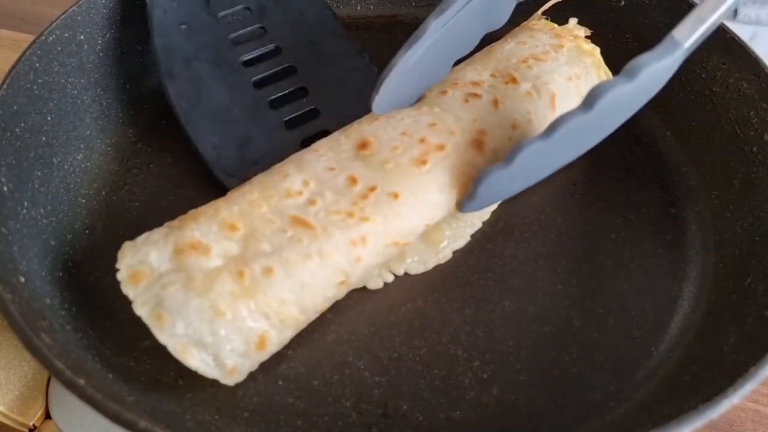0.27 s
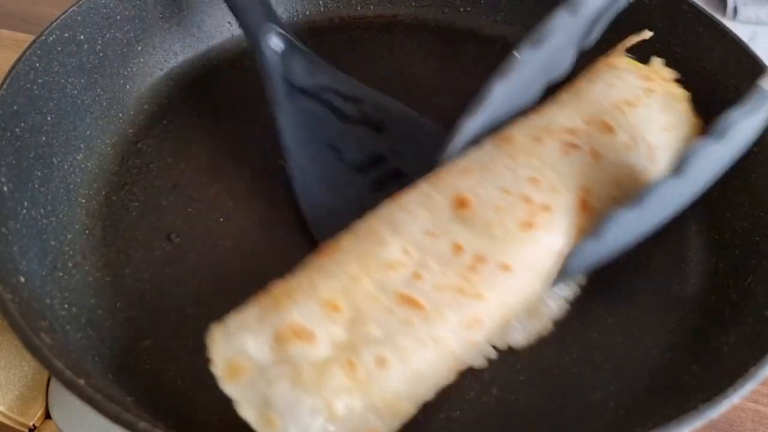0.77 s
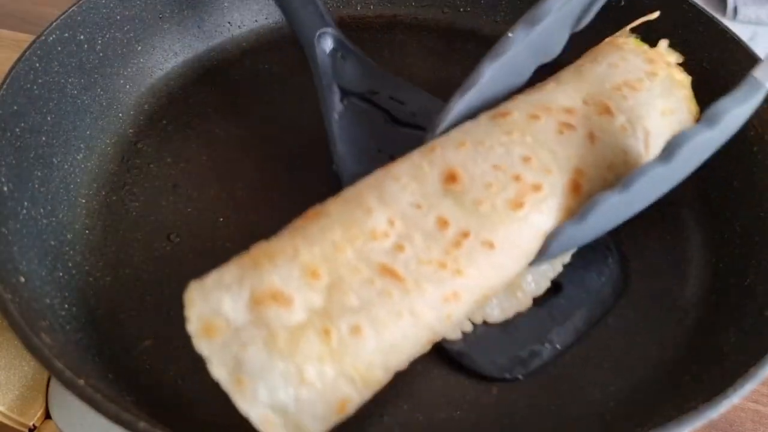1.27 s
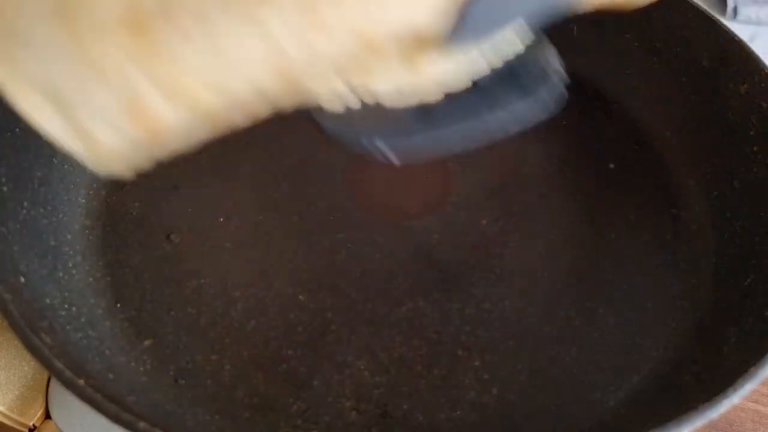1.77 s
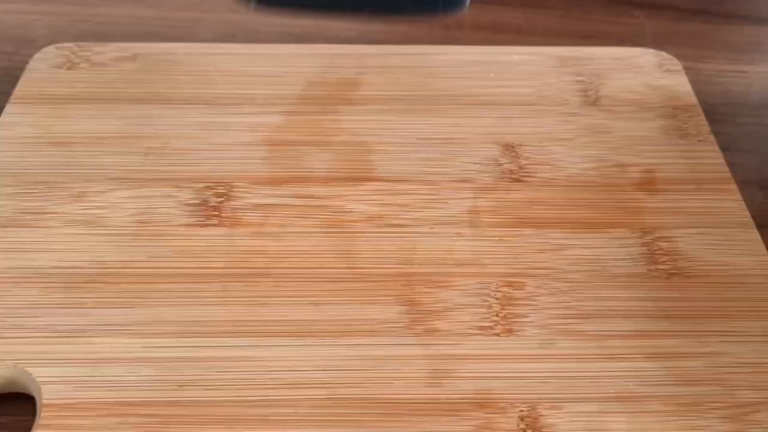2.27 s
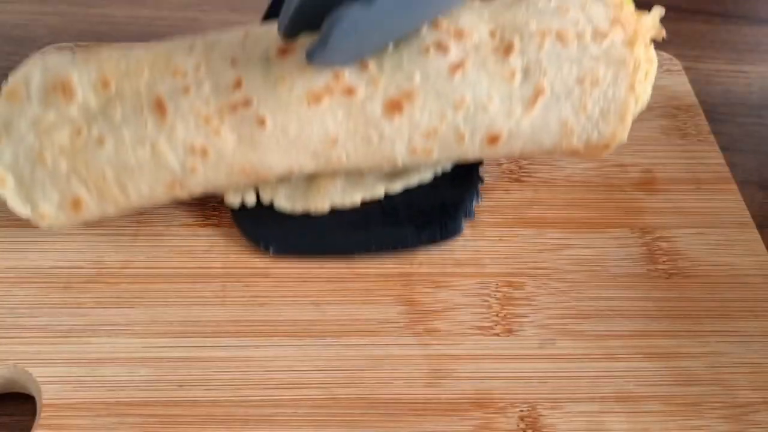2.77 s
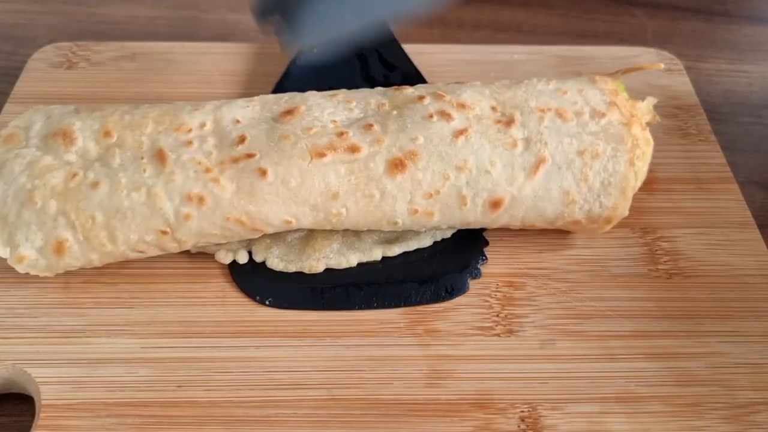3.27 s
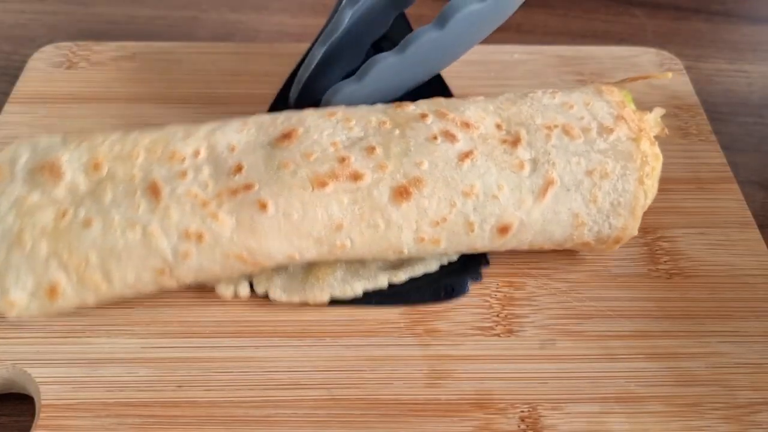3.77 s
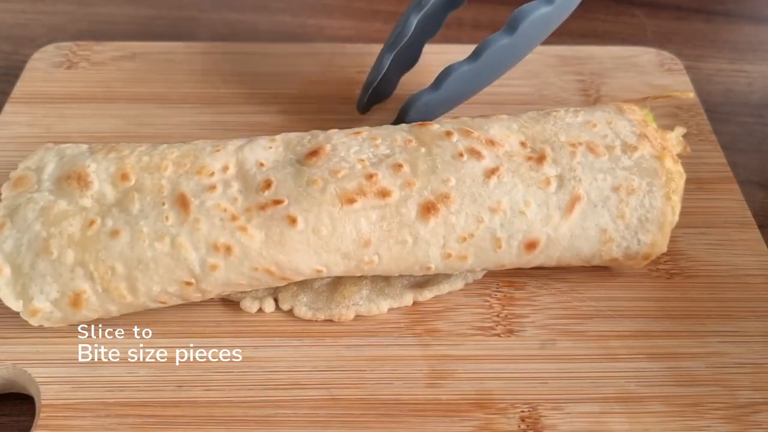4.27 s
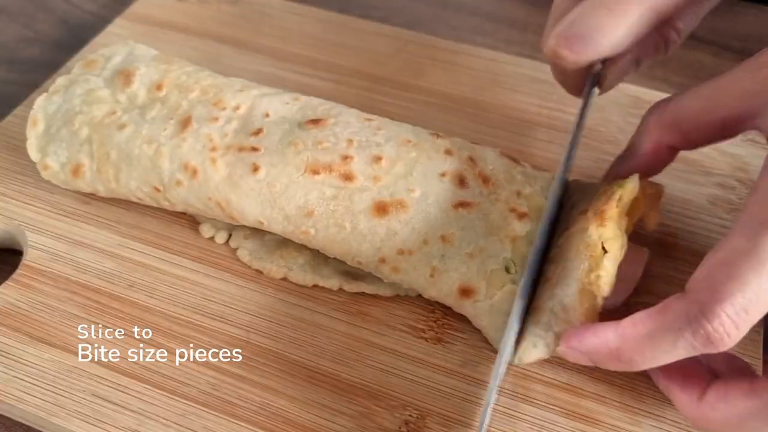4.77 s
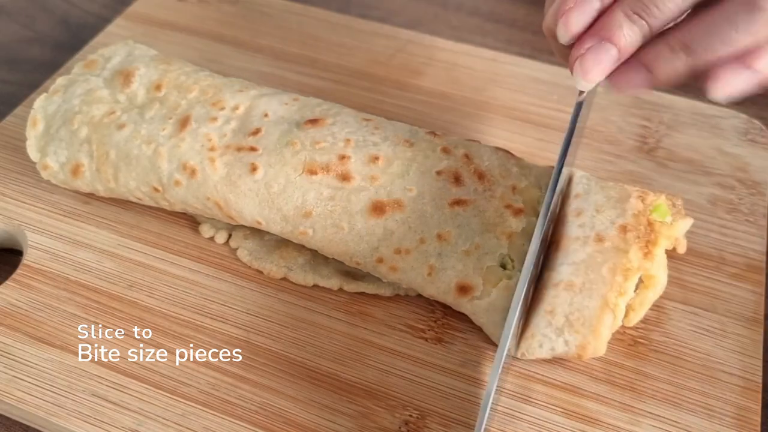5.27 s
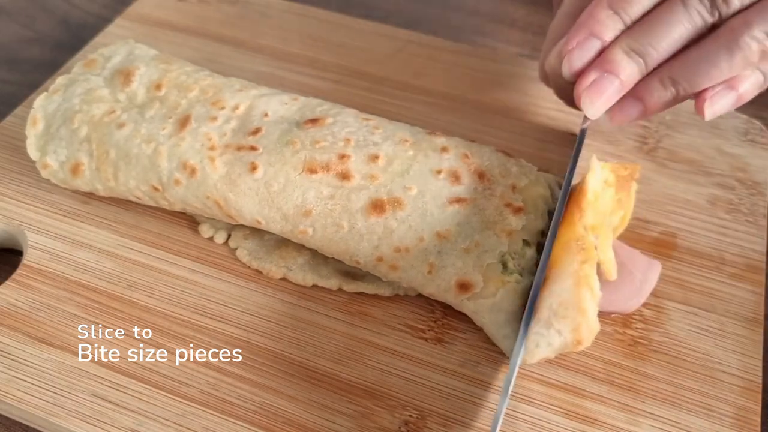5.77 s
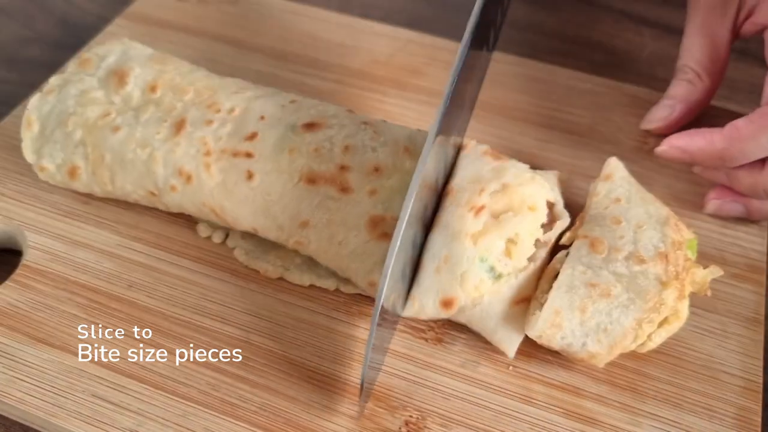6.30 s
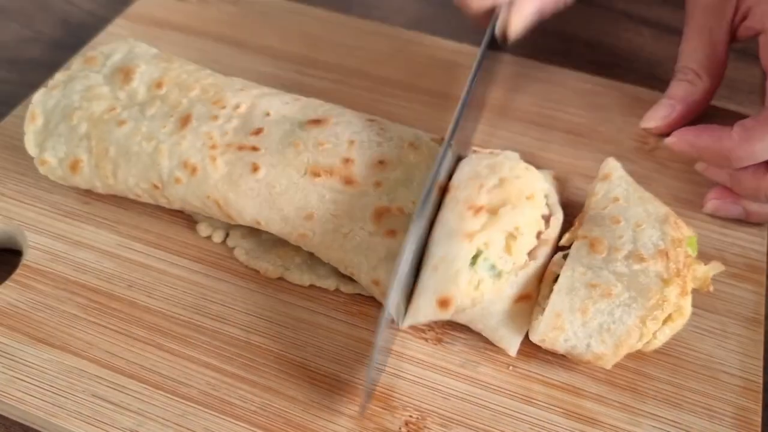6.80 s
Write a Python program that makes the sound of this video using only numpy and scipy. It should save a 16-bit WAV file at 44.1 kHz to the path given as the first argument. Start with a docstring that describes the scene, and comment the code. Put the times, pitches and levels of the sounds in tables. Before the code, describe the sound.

Close-up cooking sounds: a gentle sizzle, a dull double knock on the pan, grainy spatula scrapes and loud crackling oil pops. A sudden change brings near quiet, with small clicks and rubs on a wooden board. Plastic drags out, its scraping tone climbing. Then come brief crackly knife presses, hard knocks and deep board thuds, ending with faint moist crackles and one last crunch. The small room echoes lightly over a soft background hiss.

```python
"""Oil sizzles and spits in a pan in a small kitchen: trains of random bubble clicks shaped by a spectrum.
A plastic spatula knocks on the pan (modes rung by blows) and is pushed under a rolled egg pancake (friction).
The pan gives way at once to a bamboo board: the roll is set down and the blade drawn out, its resonance rising.
A knife then crunches through the roll (clumps of tiny cracks) and knocks on the board; near the end comes
a second stretch of cutting. Echoes follow the work, and a soft rumble, hiss and faint whine run throughout."""
import sys
import numpy as np
from scipy import signal
from scipy.fft import rfft, irfft, next_fast_len
from scipy.io import wavfile
from scipy.ndimage import uniform_filter1d

SR = 44100
rng = np.random.default_rng(int(sys.argv[2]) if len(sys.argv) > 2 else 0)


def waveform_to_disk(signal):
    """Save audio, clipped to [-1, 1], as 16-bit WAV at the path in sys.argv[1]."""
    frames = np.transpose(np.atleast_2d(signal))
    scaled = np.clip(frames, -1, 1) * 32767
    samples = np.round(scaled).astype(np.int16)
    wavfile.write(sys.argv[1], SR, samples)


N = 310451
TIME = np.arange(N) / SR
SIZE = 2 * next_fast_len(N // 2 + SR // 4)  # transform length [samples], with room for decay
FREQS = np.fft.rfftfreq(SIZE, 1 / SR) + 1e-3  # [Hz], kept above zero for the logarithm

BOARD_START_S, LAST_START_S = 2.306, 5.895  # the board replaces the pan; the last stretch of cutting begins

# Frying as the roll is loosened and lifted out:
# (time [s], relative level [dB], share of the sizzle from bare oil [0-1])
FRYING = [(0, -41.5, 0.13), (.55, -39, 0), (.8, -42, 0), (1.2, -42.5, 0.27), (1.33, -32.5, 0.96),
          (1.45, -39, 0.42), (1.62, -40.5, 0.1), (1.71, -38, 0.78), (2.29, -41, .98)]
# The knife presses into the roll:
# (start [s], length [s], relative crunch level [dB], shudder level of the board [dB])
SLICES = [(4.543, 0.009, -45, -54), (4.74, 0.041, -43, -35.5), (4.795, 0.055, -32.5, -53),
          (5.082, 0.027, -37.5, -38.5), (5.496, .003, -41.5, -60), (5.53, 0.055, -35, -33.5),
          (5.754, 0.0055, -35, -40), (5.839, .052, -36, -30), (5.922, 0.21, -60.5, -64),
          (6.298, 0.1, -53, -56), (6.471, 0.069, -53.5, -71), (6.908, 0.1, -37, -33.5)]
# Resonances of the board under friction and cracks: (centre [Hz], width [Hz], height [dB])
BOARD_PEAKS = [(320, 36, 1.5), (563, 36, 0), (885, 300, 12), (1306, 47, 2.5)]
# A tool's edge strikes the bare board:
# (time [s], relative level [dB], contact hardness [Hz], relative level of the edge's tick [dB])
TAPS = [(3.0043, -31.5, 4060, -28), (3.713, -28.5, 4000, -23.5), (5.0686, -3.5, 2180, -22),
        (5.7458, -5, 1230, -6.5), (5.887, -19.5, 1410, -15), (6.2039, -35, 3440, -25),
        (6.6204, -21.5, 980, -33)]


def from_db(db):
    """Amplitude ratio from its logarithmic measure, the decibel."""
    return 10 ** (np.asarray(db) / 20)


def rms_one(x):
    """Normalisation of the mean power to 1."""
    return x / np.sqrt(np.mean(x ** 2) + 1e-20)


def in_time(rows):
    """Linear interpolation in time of each column of a curve."""
    times, *columns = np.transpose(rows)
    return [np.interp(TIME, times, column) for column in columns]


def during(start, end):
    """Rectangular gate between two times, with short ramps that avoid a click."""
    return uniform_filter1d(1. * ((TIME >= start) & (TIME < end)), size=64)


def cut(x, hz, kind, order=2):
    """Butterworth filter: a pass band without ripple."""
    sections = signal.butter(order, np.clip(hz, 10, .45 * SR), kind, fs=SR, output="sos")
    return signal.sosfilt(sections, x + 1e-18)


def colour(x, spectrum, peaks=()):
    """Minimum-phase filter, found by folding the cepstrum of a broad spectrum with resonances on top."""
    hz, db = np.transpose(spectrum)
    curve = np.interp(np.log(FREQS), np.log(hz), db)
    for centre, width, height in peaks:
        curve = curve + height / (1 + (2 * (FREQS - centre) / width) ** 2)
    cepstrum = irfft(np.log(from_db(curve)))[:SIZE // 2]
    cepstrum[1:] *= 2
    return irfft(rfft(x, SIZE) * np.exp(rfft(cepstrum, SIZE)))[:N]


def resonance(x, hz, width):
    """Two-pole resonator, whose pole radius sets its bandwidth; gain 1 on top."""
    r = np.exp(-np.pi * width / SR)
    zeros = np.array([1, 0, -1]) * (1 - r * r) / 2
    poles = [1, -2 * r * np.cos(2 * np.pi * hz / SR), r * r]
    return signal.lfilter(zeros, poles, x)


def drift(rate):
    """Slow fluctuation: noise low-passed at a rate [Hz], with rms 1."""
    return rms_one(cut(rng.standard_normal(N + SR), rate, "low")[SR:])


def grains(per_s, spread_db, clump_db, clump_rate):
    """Shot noise: random clicks of uneven size that swell in clumps; rms 1."""
    unevenness = np.minimum(rng.exponential(1, N), 5)
    sizes = from_db(spread_db * unevenness + clump_db * drift(clump_rate))
    signs = rng.choice([-1, 1], N)
    return rms_one(sizes * signs * (rng.random(N) < per_s / SR))


def add(out, s, sound):
    """Superposition of a short sound from a given time on."""
    part = out[round(s * SR):][:len(sound)]
    part += sound[:len(part)]


def knocks(blows, modes):
    """Modal synthesis: blows ring damped modes of alternating sign; a soft contact low-passes the force."""
    force, out = np.zeros(N), np.zeros(N)
    for s, db, hardness_hz in blows:
        contact = cut(signal.unit_impulse(SR // 10), hardness_hz, "low", order=3)
        add(force, s, from_db(db) * contact)
    for k, (hz, db, t60) in enumerate(modes):
        r, w = from_db(-60 / (t60 * SR)), 2 * np.pi * hz / SR
        ring = signal.lfilter([0, np.sin(w)], [1, -2 * r * np.cos(w), r * r], force + 1e-18)
        out += (-1) ** k * from_db(db) * ring
    return out


def snaps(rows, width_hz, crack, tail, tail_s):
    """Impulse excitation: a click with a short noisy tail, part raw and part rung at its own pitch."""
    out, t = np.zeros(N), TIME[:SR // 20]
    for (s, db, hz), noise in zip(rows, rng.standard_normal((len(rows), len(t)))):
        burst = signal.unit_impulse(len(t)) + tail * noise * np.exp(-t / tail_s)
        rung = resonance(resonance(burst, hz, width_hz), hz, width_hz)
        snap = cut(rung + crack * burst, 860, "high")
        add(out, s, from_db(db) * snap / np.abs(snap).max())
    return out


def with_treble(x, treble_db, split_hz):
    """Two-band balance: body at rms 1, and the fine hiss above it at a level of its own."""
    body = rms_one(cut(x, split_hz, "low", order=4))
    hiss = rms_one(cut(x, split_hz, "high", order=4))
    return body + from_db(treble_db) * hiss


def presses(rows, attack_s, release_s):
    """Gain of gestures (start, length, dB) with exponential flanks, in seconds per 20 dB, summed in power."""
    power = np.zeros(N)
    for start, length, db in rows:
        before = np.maximum(start - TIME, 0) / attack_s
        after = np.maximum(TIME - start - length, 0) / release_s
        # a gesture begun before the last stretch ends where that begins
        stop = LAST_START_S if start < LAST_START_S else np.inf
        power += from_db(db - 20 * np.minimum(before + after, 10)) ** 2 * (TIME < stop)
    return np.sqrt(power)


def kitchen(x, wet_db, t60):
    """Reverberation: direct sound and a dull, exponentially decaying tail that starts with the nearest walls."""
    # Colour of the diffuse sound: (frequency [Hz], gain [dB])
    room_colour = [(60, 1), (250, 0.5), (700, -1), (1200, -3), (2200, -4), (6000, -6), (15000, -10.5)]
    t = TIME[:SR // 2]
    tail = rng.standard_normal(len(t)) * from_db(-60 * t / t60) * (t > .006)
    diffuse = signal.fftconvolve(x, tail / np.linalg.norm(tail))[:N]
    return x + from_db(wet_db) * colour(diffuse, room_colour)


def background():
    """Stationary noise: soft rumble and hiss of the kitchen, with a faint electric whine in narrow bands."""
    # Spectrum of the still kitchen: (frequency [Hz], relative density [dB])
    still_spectrum = [(15, -41.5), (30, -6.5), (60, -7.5), (130, -13.5), (400, -16), (850, -11),
                      (1300, -24.5), (2200, -26), (5000, -32.5), (16000, -33)]
    # Its loudness: (time [s], level [dB])
    still_level = [(0, -48), (2.3, -54), (4.4, -52.5), (4.5, -56), (5.9, -58.5), (7.04, -58.5)]
    # Electric whine: (frequency [Hz], level [dB])
    whine_tones = [(3050, -73), (6000, -74)]
    air = from_db(in_time(still_level)[0]) * rms_one(colour(rng.standard_normal(N), still_spectrum))
    for hz, db in whine_tones:
        air = air + from_db(db) * rms_one(resonance(rng.standard_normal(N), hz, 25))
    return air


def sizzle():
    """Bursting steam bubbles as shot noise: dense hiss under the roll, sparser bright crackle from bare oil."""
    # Sizzle under the roll: (frequency [Hz], relative density [dB])
    covered_spectrum = [(150, -14), (450, -10.5), (600, -5), (1300, -3), (2200, -3.5), (3100, -1),
                        (4800, -4.5), (6500, -2), (9000, -4.5), (13000, -5), (16000, -8.5)]
    # Sizzle of bare oil: (frequency [Hz], relative density [dB])
    open_spectrum = [(150, -25), (450, -21), (650, -1), (1200, -15), (2300, -5), (3800, 2.5), (6000, 2.5),
                     (7600, -17), (9800, -1.5), (11500, 5.5), (14500, 5.5), (16000, -4)]
    level_db, bare = in_time(FRYING)
    bare = np.clip(bare, 0, 1)
    dense = grains(per_s=14000, spread_db=4.0, clump_db=0.65, clump_rate=43)
    sparse = grains(per_s=7000, spread_db=6.0, clump_db=4.5, clump_rate=110)
    covered = np.sqrt(1 - bare) * rms_one(colour(dense, covered_spectrum))
    crackle = np.sqrt(bare) * rms_one(colour(sparse, open_spectrum))
    return from_db(level_db + 3.5) * covered + from_db(level_db + 3.0) * crackle


def spitting():
    """Water drops burst in the oil as impulses: a few loud, and random small ones in proportion to bare oil."""
    # The loudest spits: (time [s], peak level [dB], centre [Hz])
    loud_spits = [(.7256, -5.5, 10700), (1.3595, -11, 8700), (1.3674, -5, 5800), (1.4051, -2, 5600),
                  (1.8844, -12, 10900), (2.0237, -6.5, 8500), (2.0624, -4, 6350), (2.1175, -12.5, 9700),
                  (2.1714, -10.5, 5000), (2.2015, -8, 9900), (2.239, 3, 4140)]
    small_per_s, small_hz = 15, 9000  # rate where all the oil lies bare; centre
    small_db, small_spread_db = -20, 4  # mean and spread of the peak level
    _, bare = in_time(FRYING)
    born = (rng.random(N) < small_per_s * bare / SR) & (TIME < BOARD_START_S)
    sizes_db = small_db + small_spread_db * rng.standard_normal(N)
    small = [(s, db, small_hz) for s, db in zip(TIME[born], sizes_db[born])]
    return snaps(loud_spits + small, width_hz=5800, crack=5.8, tail=0.086, tail_s=0.0011)


def pan_knocks():
    """Modal ringing of the pan under blows of the spatula."""
    # Blows: (time [s], relative level [dB], contact hardness [Hz])
    pan_blows = [(.2045, -7.5, 3500), (.2505, -18.5, 1460)]
    # Modes of the pan: (frequency [Hz], relative level [dB], 60 dB decay time [s])
    pan_modes = [(77.1, -19, 0.14), (527, -0.5, 0.04), (578, -2, 0.048), (661, -21.5, 0.4),
                 (870, -6, 0.034), (1078, -7.5, 0.038), (1380, -22, 0.12), (1535, -21, 0.056),
                 (1890, -12.5, 0.021), (2330, -13.5, 0.019), (2800, -15, 0.013)]
    return knocks(pan_blows, pan_modes)


def pan_scrape():
    """Friction on the grainy coating; a harder push sounds brighter, and the pan wobbles on the hob."""
    # Strokes that swell and fade evenly: (middle [s], length [s], relative level [dB])
    strokes = [(0.629, 0.17, -19), (0.87, 0.096, -19), (0.964, 0.13, -24), (1.064, 0.1, -19.5),
               (1.262, 0.075, -12.5)]
    # Spectrum of the scrape: (frequency [Hz], relative density [dB])
    scrape_spectrum = [(40, -16), (80, -7.5), (150, -29.5), (280, -14.5), (470, -16.5), (550, -0.5),
                       (900, -1.5), (1500, -8.5), (2200, -3.5), (3200, -8), (5500, -11.5), (7500, -21),
                       (15000, -31)]
    # Resonances of the scraped pan: (centre [Hz], width [Hz], height [dB])
    pan_peaks = [(557.4, 17, 7), (830, 26, 6), (1020, 60, 3), (1920, 120, -2), (2950, 80, -0.5),
                 (4200, 100, 1)]
    edge_db, squareness = 10, 2.25  # ends under middle; above 2 the top is flatter than a bell
    power = 0
    for middle, length, db in strokes:
        fall = np.minimum(np.abs(2 * (TIME - middle) / length) ** squareness, 10)
        power = power + from_db(db - edge_db * fall) ** 2
    push = np.sqrt(power)
    contacts = grains(per_s=14000, spread_db=2.8, clump_db=1.5, clump_rate=110)
    rub = rms_one(colour(contacts, scrape_spectrum, pan_peaks))
    # once the blade lies flat under the roll it damps the pan's ring near 545 Hz
    damping = np.clip(np.interp(TIME, [1.12, 1.22], [0, .65]), 0, 1)
    rub = rub - damping * resonance(rub, 545, 160)
    low = cut(rub, 830, "low", order=1)
    brightness = (push / from_db(-19)) ** 0.41
    wobble = rms_one(cut(rng.standard_normal(N), [55, 100], "band"))
    wobble = wobble * np.interp(TIME, [1.3, 1.8], [1, .2])
    return from_db(-1) * push * (low + brightness * (rub - low)) + from_db(-50.5) * wobble


def board_knocks(start, end):
    """Modal ringing of the board on its table under the thumps and taps that fall between two times."""
    # Soft thumps through the roll: (time [s], relative level [dB], contact hardness [Hz])
    thumps = [(2.311, -26, 202), (4.305, -12, 108), (4.948, -4.5, 129.1), (5.241, -20, 168),
              (5.601, 8, 114), (5.749, 7.5, 109)]
    # Modes of the board on its table: (frequency [Hz], relative level [dB], 60 dB decay time [s])
    board_modes = [(84.6, -20, 0.25), (144, -22.5, 0.11), (212, -20, 0.14), (315.5, -12, 0.07),
                   (551, -8, 0.031), (820, 6.5, 0.0063), (958, 3.5, 0.023), (1220, -14.5, 0.024),
                   (1780, -11.5, 0.024)]
    contacts = thumps + [(s, db, hardness_hz) for s, db, hardness_hz, _ in TAPS]
    return knocks([row for row in contacts if start <= row[0] < end], board_modes)


def shudder():
    """Forced vibration: the board rumbles under the knife and, jostled, rocks at its own low resonance."""
    # The board is jostled on its table: (start [s], length [s], level [dB])
    jostles = [(2.32, 0.067, -51), (4.24, 0.15, -41.5)]
    # Spectrum of the rumble: (frequency [Hz], relative density [dB])
    rumble_spectrum = [(25, -24.5), (60, -1.5), (115, -10), (180, -12), (310, -15.5), (450, -39),
                       (1500, -66)]
    # The board bouncing on its table: (centre [Hz], width [Hz], height [dB])
    table_peak = [(79.7, 5.1, 9.5)]
    attack_s, release_s = 0.026, 0.15  # time per 20 dB
    loads = [(start, length, db) for start, length, _, db in SLICES]
    rumble = colour(rng.standard_normal(N), rumble_spectrum, table_peak)
    rumble = rms_one(cut(rumble, 51, "high", order=3))
    rocking = rms_one(resonance(rng.standard_normal(N), hz=84, width=19))
    return presses(loads, attack_s, release_s) * rumble + presses(jostles, attack_s, release_s) * rocking


def board_slide():
    """Friction of plastic on bamboo; the blade's resonance rises as it comes out from under the roll."""
    # Short rubs as the roll is settled: (start [s], length [s], relative level [dB])
    slides = [(3.01, .14, -50), (3.183, 0.025, -39.5), (3.235, 0.045, -42.5), (3.53, 0.035, -43),
              (3.778, 0.011, -39.5)]
    # Spectrum of the rub: (frequency [Hz], relative density [dB])
    slide_spectrum = [(60, -20), (170, -25), (350, -12.5), (600, -5), (900, -7), (1150, -2), (2000, 0),
                      (3200, -0.5), (5000, -8.5), (7000, -23.5), (12000, -28.5), (16000, -39)]
    # The spatula is drawn out:
    # (time [s], relative level [dB], resonance of the blade [Hz], treble against body [dB])
    pull_curve = [(3.76, -68.5, 1400, -18), (3.82, -40.5, 1900, -20), (3.98, -21, 2084, -14),
                  (4.079, -22.5, 2457, -13.5), (4.2, -20, 2770, -3.5), (4.29, -20, 3325, -30),
                  (4.349, -52.5, 3400, -30), (4.52, -80, 3400, -25)]
    level_db, centre_hz, treble_db = in_time(pull_curve)
    pull = from_db(level_db) * during(pull_curve[0][0], pull_curve[-1][0])
    grip = from_db(0.8 * drift(25))  # the blade grips and slips
    push = (presses(slides, attack_s=0.019, release_s=0.015) + pull) * grip
    contacts = grains(per_s=14000, spread_db=2.0, clump_db=0.5, clump_rate=35)
    rub = rms_one(colour(contacts, slide_spectrum, BOARD_PEAKS))
    # low-passed noise on a gliding carrier makes a moving resonance
    carrier = np.cos(2 * np.pi * np.cumsum(centre_hz) / SR)
    blade = rms_one(cut(rng.standard_normal(N), 460, "low") * carrier)
    return from_db(-3.0) * push * (with_treble(rub, treble_db, split_hz=6460) + from_db(-2.5) * blade)


def rasps_and_squeaks():
    """Resonance of noise in short swells: scrapes of the spatula, a squish of the roll, a squeak of the crust."""
    # Rasps and squeaks:
    # (middle [s], rms level at the height of the swell [dB], centre [Hz], width [Hz], length [s])
    swells = [(3.348, -31.5, 2920, 694, 0.0029), (4.27, -21, 3525, 800, 0.11),
              (4.329, -26.5, 2714, 3000, 0.013), (4.804, -43, 1880, 2500, 0.034),
              (5.528, -21, 6540, 1200, 0.016)]
    out = np.zeros(N)
    for (s, db, hz, width, length), noise in zip(swells, rng.standard_normal((len(swells), SR // 2))):
        swell = np.hanning(round(length * SR))
        band = rms_one(resonance(noise, hz, width))[:len(swell)]
        add(out, s - length / 2, from_db(db) * swell * band)
    return out


def tool_clicks():
    """Impulse excitation: clicks of the tools and the crust, and an edge's tick just after each tap."""
    # The clearest clicks: (time [s], relative peak level [dB], centre [Hz])
    clear_clicks = [(3.3866, -26.5, 2300), (4.5117, -25, 3050), (4.7016, -23, 3240), (4.7402, -23, 4300),
                    (4.9502, -16, 4100), (5.5721, -11.5, 9800), (5.6287, -11, 5500), (5.6398, -17.5, 4300),
                    (5.7036, -18, 4000), (5.9384, -26.5, 4280), (6.3718, -21, 3580), (6.4075, -19.5, 3060)]
    tick_hz, tick_lag_s = 2560, 0.00098
    ticks = [(s + tick_lag_s, tick_db, tick_hz) for s, _, _, tick_db in TAPS]
    return from_db(-4.0) * snaps(clear_clicks + ticks, width_hz=2600, crack=0.18, tail=1.0, tail_s=0.00074)


def slicing():
    """Brittle fracture: clumps of tiny cracks under the knife, settling afterwards, coloured by the board."""
    # Spectrum of the cracks: (frequency [Hz], relative density [dB])
    slice_spectrum = [(120, 2), (320, -3.5), (400, -0.5), (550, -1), (750, -8.5), (1000, -1), (1300, -2),
                      (3500, 2), (6000, -4), (9000, -7), (14000, -8), (16000, -18)]
    attack_s, release_s = 0.024, 0.024  # time per 20 dB
    settle_db, settle_s = -13, 0.49  # the crust crackles on: level under the crunch, time per 20 dB
    crunches = [(start, length, db) for start, length, db, _ in SLICES]
    settling = from_db(settle_db) * presses(crunches, attack_s, settle_s)
    push = presses(crunches, attack_s, release_s) + settling
    dense = grains(per_s=11000, spread_db=2.5, clump_db=4.5, clump_rate=89)
    sparse = grains(per_s=700, spread_db=3.8, clump_db=3.0, clump_rate=40)
    # a light touch gives single moist crackles, a firm push merges them into a crunch
    firm = push / (push + from_db(-51))
    cracks = np.sqrt(firm) * dense + np.sqrt(1 - firm) * sparse
    return from_db(3.0) * push * rms_one(colour(cracks, slice_spectrum, BOARD_PEAKS))


def board_work():
    """Superposition of all board sounds in two stretches; all ringing and echoes stop abruptly where a stretch
    ends."""
    handling = board_slide() + slicing() + rasps_and_squeaks() + tool_clicks() + shudder()
    out, edges = 0, [BOARD_START_S, LAST_START_S, N / SR]
    for start, end in zip(edges, edges[1:]):
        gate = during(start, end)
        out = out + gate * kitchen(handling * gate + board_knocks(start, end), wet_db=-7.5, t60=0.41)
    return out


def scene():
    """Superposition of the pan, then the board, over the kitchen's background."""
    board, air = board_work(), background()
    # the pan's wide bottom sends more sound into the room than the oil does
    knock = kitchen(pan_knocks(), wet_db=0.0, t60=0.44)
    frying = kitchen(sizzle() + pan_scrape() + spitting(), wet_db=-9.5, t60=0.52)
    return ((frying + knock) * during(0, BOARD_START_S) + board + air)[None]


def record(dry):
    """Soft saturation rounds the highest peaks, and an elliptic low-pass cuts the top steeply."""
    cutoff_hz = 15700
    rounded = dry / (1 + (dry / .9) ** 6) ** (1 / 6)
    return signal.sosfilt(signal.ellip(12, .1, 100, cutoff_hz, fs=SR, output="sos"), rounded)


dry = scene()
out = record(dry)
waveform_to_disk(out)
```